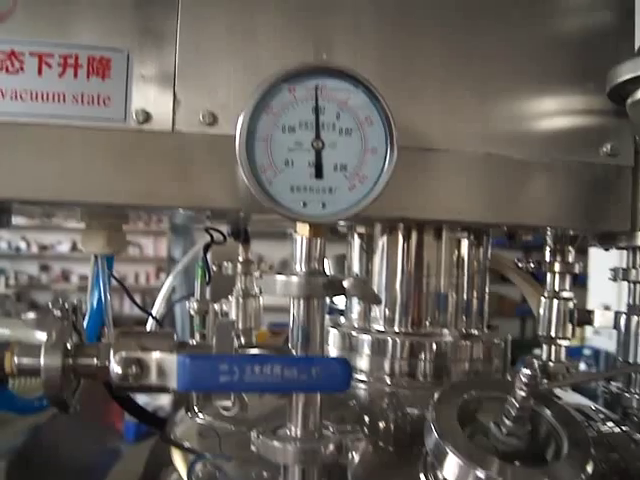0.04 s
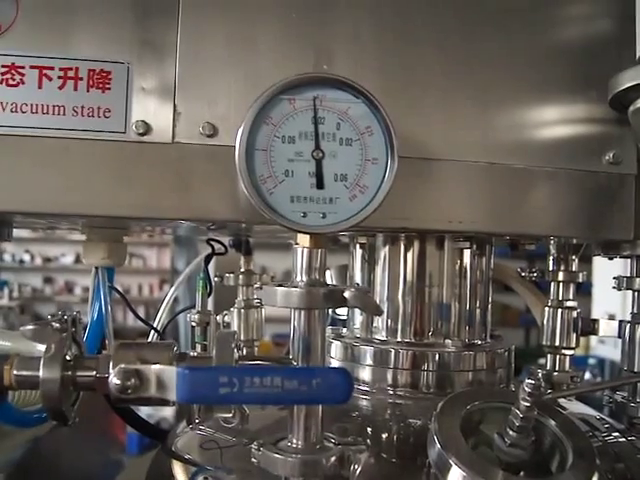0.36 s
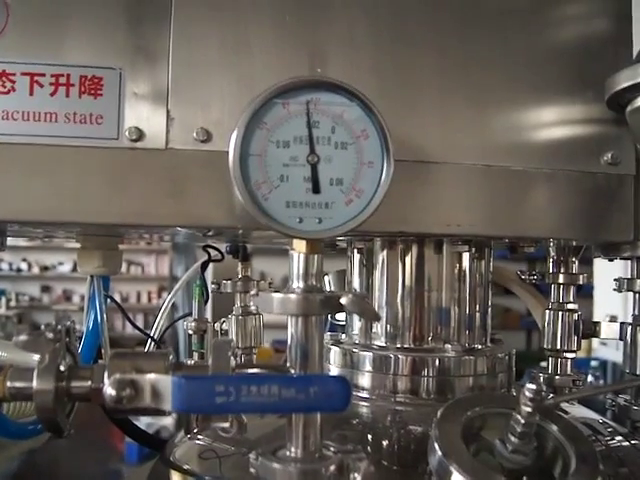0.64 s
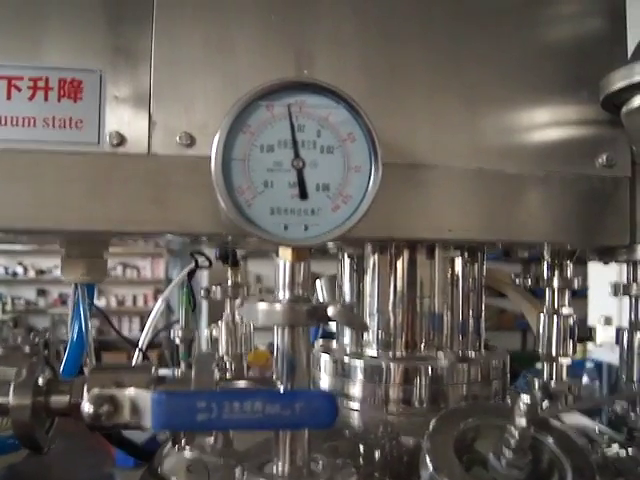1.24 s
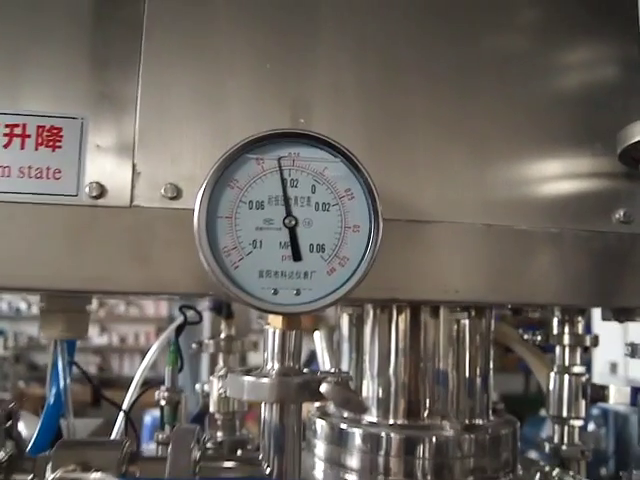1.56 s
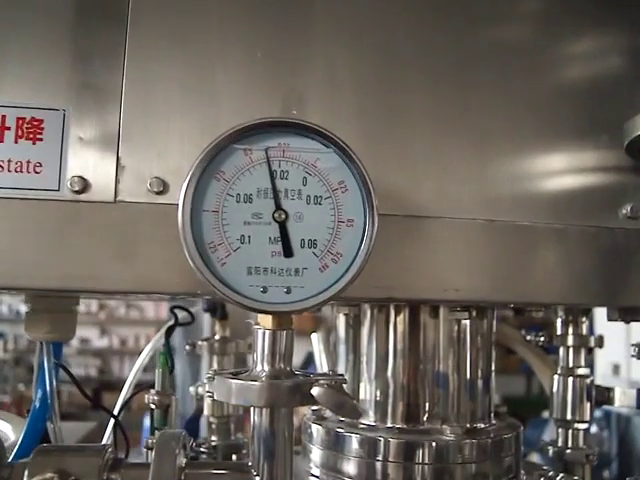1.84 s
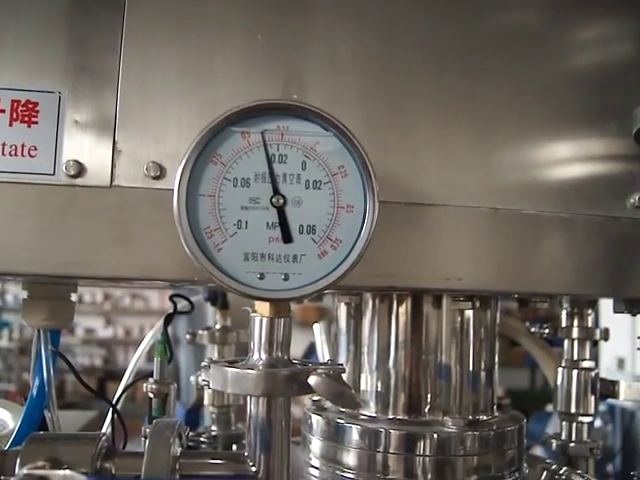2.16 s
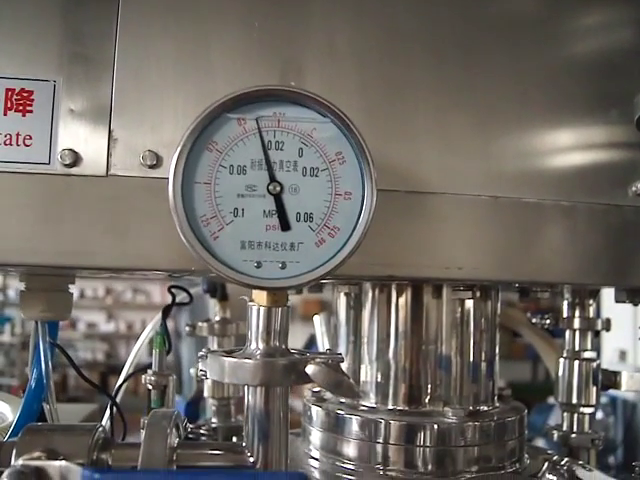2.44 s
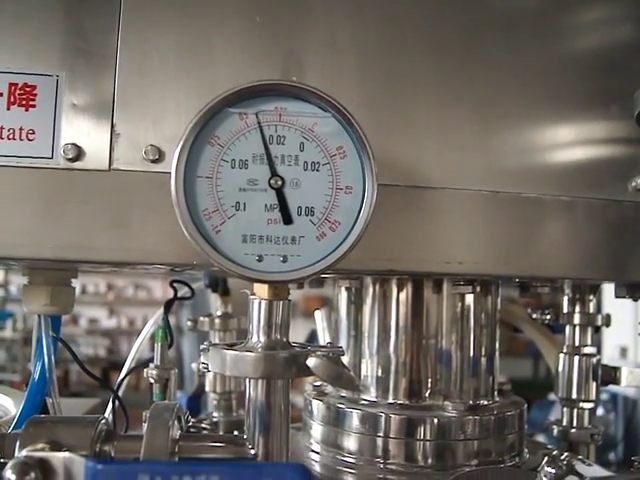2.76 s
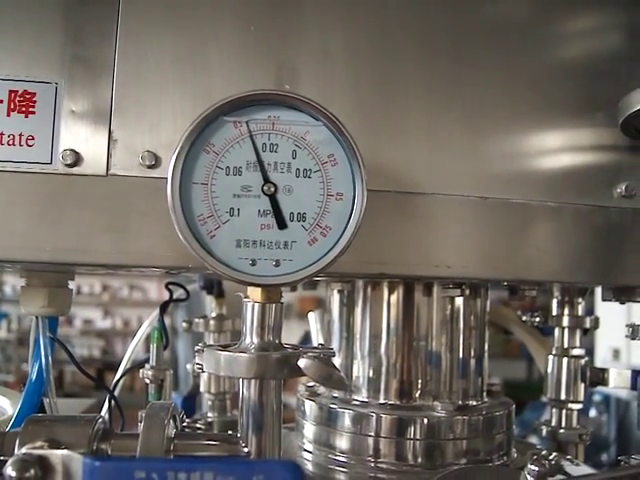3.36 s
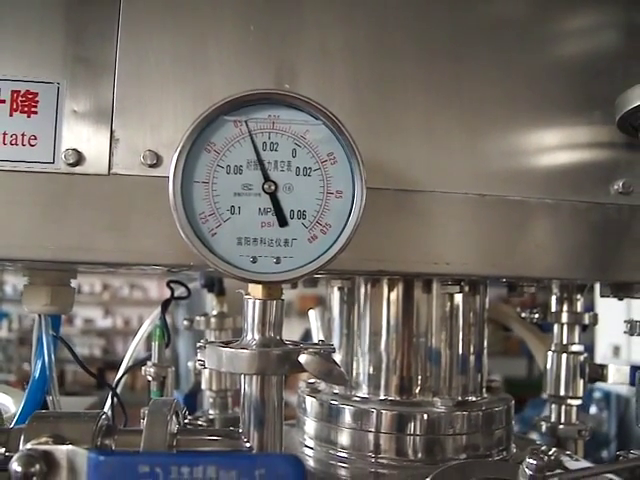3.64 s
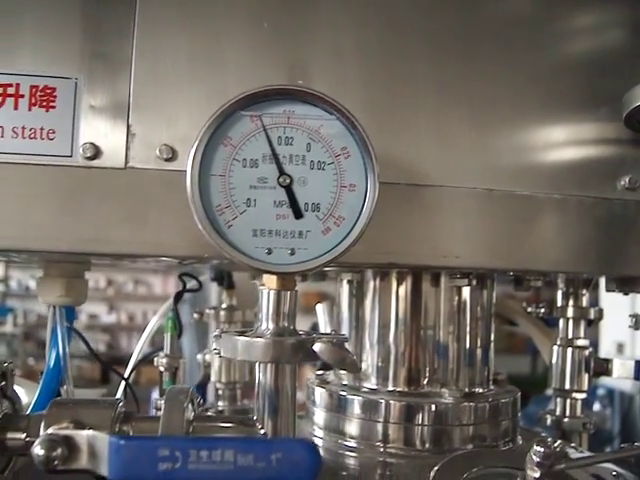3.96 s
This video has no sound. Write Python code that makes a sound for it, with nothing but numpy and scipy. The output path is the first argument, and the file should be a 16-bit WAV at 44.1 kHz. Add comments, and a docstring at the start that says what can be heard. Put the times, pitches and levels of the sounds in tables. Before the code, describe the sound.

The motor and pump of a steel mixing vessel hum steadily for all four seconds, several mid-pitched tones gently throbbing over a churning rush, a bright hiss and a faint low workshop rumble. Two light metallic ticks sound close by, at about 0.6 and 1.2 seconds. Soft, brief swishes pass near 0.6, 1.4, 2 and 3.1 seconds while the machine keeps the same speed.

```python
"""Mixing vessel in a workshop

The electric motor and vacuum pump of a steel mixing vessel run steadily over a faint rumble.
The motor hums at multiples of its turning rate, and the pull of its magnets adds tones above them.
Swirling flow in the pump churns and hisses beneath the hum, and makes the casing ring.
Two light metallic ticks and a few soft swishes sound close by."""
import sys
import numpy as np
from scipy import signal
from scipy.fft import rfft, irfft
from scipy.io import wavfile

SR = 44100
rng = np.random.default_rng(int(sys.argv[2]) if len(sys.argv) > 2 else 0)


def bounce(signal):
    """Save signal as a 16-bit WAV file at the path given by the first command-line argument."""
    frames = np.transpose(np.atleast_2d(signal))
    limited = np.clip(frames, -1, 1)
    pcm = np.round(limited * 32767).astype(np.int16)
    wavfile.write(sys.argv[1], SR, pcm)


N = 176400
T = np.arange(N) / SR
HZ = np.maximum(np.arange(N // 2 + 1) * SR / N, 1)
SIDES = np.array([[.5], [-.5]])   # splits a left-minus-right amount between the two channels
CROSSOVER_HZ = 1400   # the churn's broad noise lies below this, the hiss above

# Tone colour of the pump's hiss, also used for the ticks: f/Hz, relative level/dB
HISS_COLOUR = [(680, -31), (1150, -3), (1370, -11), (1420, -8.5), (1490, -6), (1620, -3.5), (1740, -6),
               (2100, -5), (2190, -8.5), (2380, -22), (2650, -9.5), (2950, -10), (3480, -20), (3830, -10),
               (4270, -12), (5840, -17), (6480, -21.5), (11100, -32.5), (13300, -39), (13900, -43)]


def from_db(db):
    """Turn decibels into a factor to multiply by."""
    return 10 ** (np.asarray(db) / 20)


def in_time(rows):
    """Join (time, value) points into a curve with a value for every sample."""
    return np.interp(T, *np.transpose(rows))


def at_hz(points):
    """Join (frequency, value) points into a curve along a logarithmic frequency scale."""
    hz, value = np.transpose(points)
    return np.interp(np.log(HZ), np.log(hz), value)


def drift(rate_hz):
    """A smooth random wobble of typical size 1, mostly slower than rate_hz."""
    wobble = irfft(rfft(rng.standard_normal(N)) / (1 + (HZ / rate_hz) ** 2), N)
    return wobble / np.sqrt(np.mean(wobble ** 2) + 1e-20)


def resonance(hz, width_hz):
    """A steep peak that lets through the frequencies near hz."""
    return 1 / (1 + ((HZ ** 2 - hz ** 2) / (HZ * width_hz)) ** 2)


def noise(colour):
    """Coloured stereo noise, narrow in the bass, wide in the treble; the channels' average has size 1."""
    # Stereo width: f/Hz, side minus middle/dB
    width = [(60, -11), (98, -19), (160, -14), (260, -16.5), (430, -15.5), (700, -18), (1150, -4.5),
             (1880, -2.5), (3070, 2), (5020, -0.5), (8210, 0), (13400, -1)]
    # Lean to the left: f/Hz, left minus right/dB
    lean = [(60, -2), (110, 3), (200, 0.5), (360, 0.5), (660, -1), (1210, 0), (2210, 1), (4030, 1.5),
            (7360, 1), (13400, 12)]
    middle, side = rfft(rng.standard_normal((2, N)))
    pair = middle + side * from_db(at_hz(width)) * [[1], [-1]]
    balance = from_db(at_hz(lean) * SIDES)
    balance /= np.sqrt(np.mean(balance ** 2, axis=0))
    out = irfft(pair * balance * colour, N)
    return out / out.mean(axis=0).std()


def rumble(level_db=-69.5, swing_db=3.0):
    """The faint, low background of the workshop swells and sinks."""
    # Tone colour of the rumble: f/Hz, relative level/dB
    colour = [(10, -9), (25, 3), (40, 0), (57, 2), (80, -1), (120, -9), (200, -17), (500, -70)]
    return from_db(level_db + swing_db * drift(11.0)) * noise(from_db(at_hz(colour)))


def swishes(grain_db=3.5):
    """Soft, scratchy bursts of high noise swell and fade."""
    # The swishes: peak t/s, half length/s, level/dB
    bursts = [(0.617, 0.029, -51.5), (1.358, 0.006, -54), (1.405, 0.032, -50), (1.56, 0.037, -57),
              (2.067, 0.017, -53), (3.1, 0.06, -50.5)]
    # Their tone colour: f/Hz, relative level/dB
    colour = [(1500, -29), (4000, 11), (8000, 1.5), (13000, -14)]
    swell = sum(from_db(db) * np.exp(-.5 * ((T - peak) / half) ** 2) for peak, half, db in bursts)
    grain = from_db(grain_db * drift(200))
    return swell * grain * noise(from_db(at_hz(colour)))


def ticks(scuff_lead_s=0.0056, scuff_hz=8000, attack_s=0.00089, decay_s=0.0018, room_fade_s=.3):
    """A bright scuff, then a short tap that sets a metal part ringing; the room adds a faint tail."""
    # The taps: t/s, level/dB, left minus right/dB, tap f/Hz, scuff level against the tap/dB
    taps = [(0.6099, -29, -2, 3300, -7.5), (1.2281, -32.5, -6, 1900, -11)]
    # Ringing tones of the metal part: f/Hz, level against the tap/dB, time to fade by 60 dB/s
    ring_tones = [(2080, 3.5, 0.02), (2700, -1, 0.019), (2970, -12, 0.018), (4100, -4, 0.018)]
    colour = from_db(at_hz(HISS_COLOUR)) * (HZ >= CROSSOVER_HZ)
    out = np.zeros((2, N))
    for tap_s, db, pan_db, tap_hz, scuff_db in taps:
        age = np.maximum(T - tap_s, 0)
        tick = sum(from_db(ring_db - 60 * age / fade_s) * np.sin(2 * np.pi * hz * age)
                   for hz, ring_db, fade_s in ring_tones)
        for start, part_db, hz in (tap_s - scuff_lead_s, scuff_db, scuff_hz), (tap_s, 0, tap_hz):
            age = np.maximum(T - start, 0)
            rise = np.minimum(age / attack_s, 1)
            room_tail = from_db(-30 - 60 * age / room_fade_s)
            fall = np.exp(-age / decay_s) + room_tail
            burst = noise(resonance(hz, width_hz=0.7 * hz) * colour)
            tick = tick + from_db(part_db) * rise * fall * burst
        out += from_db(db + pan_db * SIDES) * tick
    return out


def pump_hiss(level_db=-43, flutter_db=.5):
    """The pump gives a bright, slightly unsteady rush."""
    # Slow rise and fall of the hiss: t/s, level change/dB
    swell = [(0, 1), (.5, 0.5), (.9, 1.5), (1.5, 0.8), (1.7, 0.1), (2.4, 0.2), (2.9, 0.5), (3.3, 0.8),
             (3.7, 0), (4, -1)]
    loudness = from_db(level_db + in_time(swell) + flutter_db * drift(43))
    return loudness * noise(from_db(at_hz(HISS_COLOUR)) * (HZ >= CROSSOVER_HZ))


def pump_churn(flow_db=-32, flutter_db=0.2):
    """Swirling flow in the pump makes a low noise and sets the casing ringing."""
    # Tone colour of the flow: f/Hz, relative level/dB
    colour = [(74, -80), (120, -31.5), (142, -23.5), (225, -21.5), (258, -12.5), (323, -6.5), (353, -10.5),
              (382, -5), (436, -8.5), (522, -6), (596, -13.5), (674, -11.5), (697, -9), (745, -7),
              (815, -4.5), (843, -4.5), (885, -2), (930, -5.5), (996, -7), (1050, -8.5), (1330, -22.5),
              (1490, -34), (1800, -32), (2340, -54), (3960, -120)]
    # Narrow bands where the casing rings: f/Hz, width/Hz, level/dB
    casing = [(321, 14, -50), (384.4, 12, -58.5), (979, 35, -40), (1571, 37, -58), (2115, 9.1, -59.5)]
    flow = from_db(flow_db) * noise(from_db(at_hz(colour)) * (HZ < CROSSOVER_HZ))
    ringing = sum(from_db(db) * noise(resonance(hz, width)) for hz, width, db in casing)
    return (flow + ringing) * from_db(flutter_db * drift(21))


def motor(shaft_hz=48.24, magnet_hz=100, vanes=15, speed_wander=0.00014, waver_depth=0.064):
    """Tones follow the shaft; magnetic pull at twice the mains rate adds higher ones (sidebands)."""
    # Strong tones, swelling and sinking as the microphone moves through their loud and quiet spots:
    # shaft multiple, sideband (0 or 1), left lead/rad, left minus right/dB, list of (t/s, level/dB)
    strong_tones = [(15, 0, -0.78, -5, [(0, -37.5), (1.6, -40.5), (2.1, -40.5), (2.7, -39.5), (4, -36.5)]),
                    (16, 0, 0.19, -1, [(0, -37.5), (.7, -39), (1.4, -37), (2.7, -35.5), (3.3, -36.5),
                    (4, -38)]), (15, 1, .2, -3, [(0, -48), (.7, -46), (1.2, -42), (1.7, -35), (2.7, -41.5),
                    (4, -37.5)]), (16, 1, -0.64, 1, [(0, -34), (1, -32), (2, -32), (3, -33.5), (4, -34)]),
                    (17, 1, 0.57, 1, [(0, -43), (2.2, -43.5), (3.1, -54), (4, -49)])]
    # Weaker, steady tones: shaft multiple, sideband (0 or 1), left lead/rad, left minus right/dB, level/dB
    weak_tones = [(7, 0, -0.29, -3, -51), (11, 0, 0, 5, -48.5), (13, 0, 0.23, -4, -55),
                  (14, 0, 0.86, 3, -50), (17, 0, 1, 7, -41), (18, 1, .2, 3, -50), (31, 0, .4, 4, -61),
                  (32, 1, .3, 0, -55.5)]
    # Whine at twice the rate of the passing vanes, fading as the microphone moves: t/s, level/dB
    whine = [(0, -48.5), (1.4, -51.5), (1.9, -58), (2.25, -54), (2.7, -65), (3.2, -65), (3.55, -51.5),
             (4, -60)]
    # Thin whistles at three to six times the vane rate: level/dB, left lead/rad
    whistles = [(-60, 2.2), (-64, 2.2), (-60.5, 1.7), (-65, 1.4)]
    # They swell and fade together as the microphone moves: t/s, level change/dB
    whistle_swell = [(0, -3), (.6, 0), (1.3, 2.5), (2.2, -1), (2.9, -4), (4, -3)]
    tones = [(*tone, in_time(levels)) for *tone, levels in strong_tones] + weak_tones
    tones.append((2 * vanes, 0, .4, 0, in_time(whine)))
    for k, (db, lead) in enumerate(whistles, start=3):
        tones.append((k * vanes, 0, lead, 0, db + in_time(whistle_swell)))

    turns = shaft_hz * np.cumsum(1 + speed_wander * drift(3.1)) / SR
    out = np.zeros((2, N))
    for multiple, sideband, lead, pan_db, db in tones:
        phase = 2 * np.pi * (multiple * turns + sideband * magnet_hz * T)
        phase += 1.256 * multiple * sideband   # neighbouring multiples throb out of step
        phase -= .8 * multiple ** 2   # the casing smears each turn: higher tones lag more
        waver = 1 + waver_depth * (drift(2.9) + 1j * drift(2.9))   # in both loudness and phase
        wave = np.sqrt(2) * np.real(waver * np.exp(1j * (phase + lead * SIDES)))
        out += from_db(db + pan_db * SIDES) * wave
    return out


def scene():
    """The running machine, the workshop and the small sounds close by, added together."""
    return motor() + pump_churn() + pump_hiss() + rumble() + ticks() + swishes()


def record(dry, silent_s=0.057, fade_s=0.014, cutoff_hz=14000):
    """The microphone weakens two narrow bands; the sound fades in quickly and its top treble is cut."""
    # Dips in what the microphone picks up: f/Hz, width/Hz, share removed
    dips = [(604, 39, 0.56), (2380, 70, 0.63)]
    response = np.prod([1 - share * resonance(hz, width) for hz, width, share in dips], axis=0)
    heard = irfft(rfft(dry) * response, N)
    fade_in = np.clip((T - silent_s) / fade_s, 0, 1)
    treble_cut = signal.ellip(12, .1, 80, cutoff_hz, fs=SR, output="sos")
    return signal.sosfilt(treble_cut, heard * fade_in)


dry = scene()
out = record(dry)
bounce(out)
```